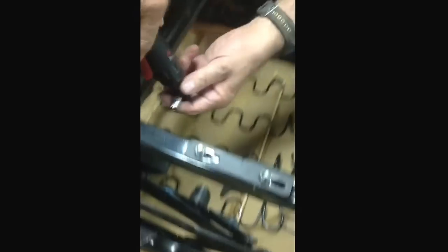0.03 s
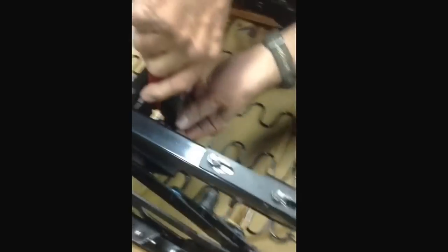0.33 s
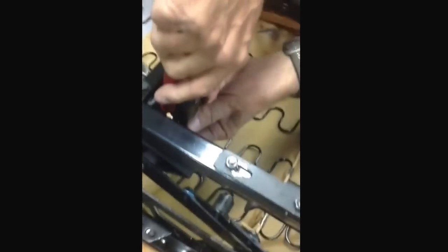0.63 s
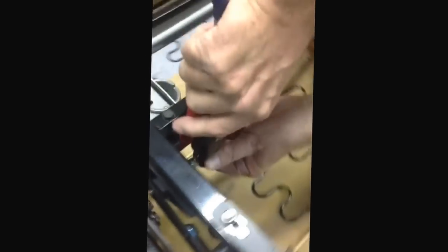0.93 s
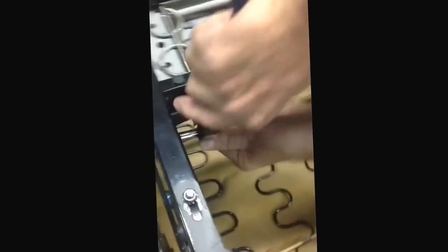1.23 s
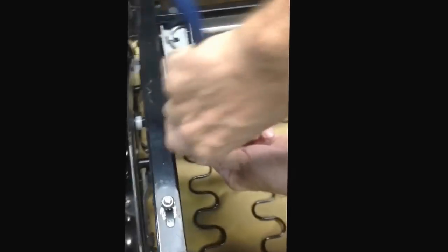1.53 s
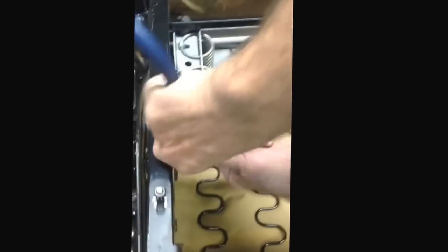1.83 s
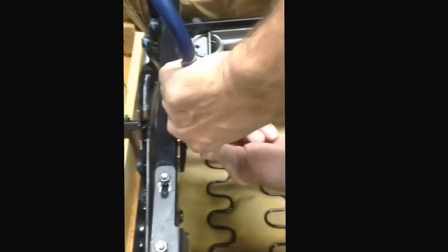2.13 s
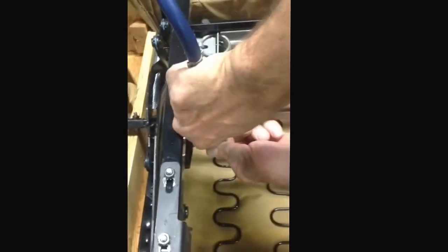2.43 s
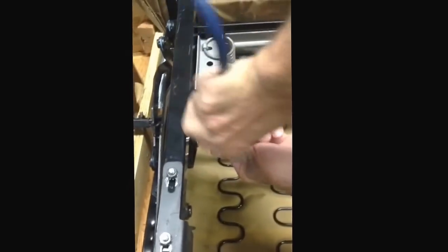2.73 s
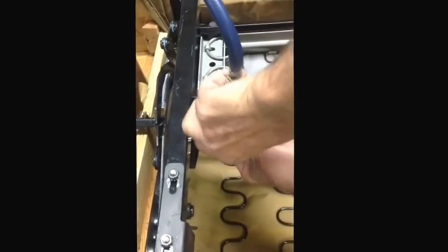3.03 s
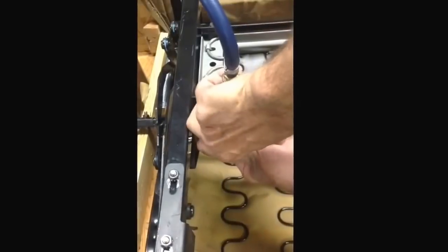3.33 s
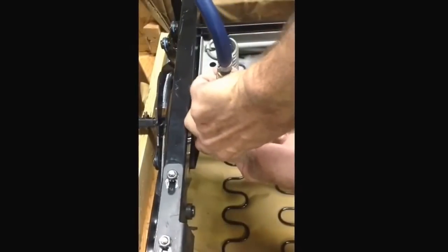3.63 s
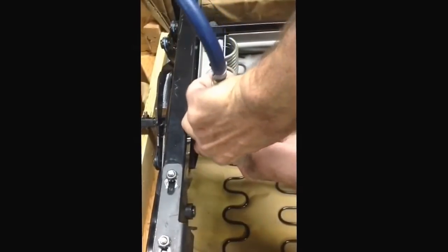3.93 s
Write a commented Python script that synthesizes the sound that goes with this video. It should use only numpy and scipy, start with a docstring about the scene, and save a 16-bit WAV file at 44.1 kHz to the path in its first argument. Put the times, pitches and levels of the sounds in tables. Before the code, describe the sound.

An air ratchet whines and rushes loudly after hose hiss and light metal ticks.

```python
"""An air ratchet drives a bolt on a steel seat frame, close by. As its valve opens, turbulent exhaust
rushes out and the vane motor whines up in pitch; as the bolt takes load, the motor slows and the pawl
rattles the steel head. Before this the tool is fitted to the bolt: the socket ticks against the frame,
and the hose coupling, which leaks all the time, spurts as it is flexed.
A low, steady workshop drone lies underneath."""
import sys
import numpy as np
from scipy import signal
from scipy.fft import rfft, irfft
from scipy.io import wavfile

SR = 44100
rng = np.random.default_rng(int(sys.argv[2]) if len(sys.argv) > 2 else 0)


def waveform_to_disk(signal):
    """Save audio, clipped to [-1, 1], as 16-bit WAV at the path in sys.argv[1]."""
    frames = np.transpose(np.atleast_2d(signal))
    scaled = np.clip(frames, -1, 1) * 32767
    samples = np.round(scaled).astype(np.int16)
    wavfile.write(sys.argv[1], SR, samples)


N = 176400
TIME = np.arange(N) / SR
TRIGGER_S = 3.269
PULSES_PER_STROKE = 17.25   # gearing: vane pulses in one cycle of the head

# motor speed as the rate at which vanes pass: (time [s], frequency [Hz])
VANE_RATE = [(3.275, 250), (3.287, 950), (3.3, 1480), (3.315, 1720), (3.33, 1820), (3.355, 1848),
             (3.39, 1825), (3.44, 1752), (3.52, 1802), (3.57, 1765), (3.65, 1660), (3.75, 1760),
             (3.79, 1700), (3.83, 1570), (3.87, 1480), (3.92, 1370), (3.96, 1320), (4.0, 1270)]


def from_db(db):
    """Amplitude ratio for a level in decibels."""
    return 10 ** (np.asarray(db) / 20)


def unit_rms(x):
    """Normalisation to unit power."""
    return x / np.sqrt(np.mean(x ** 2) + 1e-20)


def in_time(rows, column=1):
    """Linear interpolation of one column at every sample."""
    rows = np.array(rows)
    return np.interp(TIME, rows[:, 0], rows[:, column])


def butterworth(x, order, hz, kind):
    """Maximally flat low-pass or high-pass filtering."""
    return signal.sosfilt(signal.butter(order, hz, kind, fs=SR, output="sos"), x)


def drift(corner_hz):
    """Random fluctuation: low-passed noise of unit rms, computed at every 40th sample."""
    pole = np.exp(-2 * np.pi * corner_hz * 40 / SR)
    slow = signal.lfilter([1], [1, -2 * pole, pole * pole], rng.standard_normal(N // 40 + 2002))[2000:]
    return np.interp(np.arange(N) / 40, np.arange(len(slow)), unit_rms(slow))


def noise(spectrum):
    """Spectral shaping of white noise, at unit rms."""
    hz, db = np.transpose(spectrum)
    bin_hz = np.maximum(np.arange(N // 2 + 1) * SR / N, 1)
    gain = from_db(np.interp(np.log(bin_hz), np.log(hz), db))
    return unit_rms(irfft(rfft(rng.standard_normal(N)) * gain, N))


def resonate(x, hz, width_hz):
    """Forced response of a two-pole resonator, at unit rms."""
    r = np.exp(-np.pi * width_hz / SR)
    return unit_rms(signal.lfilter([1, 0, -1], [1, -2 * r * np.cos(2 * np.pi * hz / SR), r * r], x))


def noise_bands(modes, envelope=1):
    """Random excitation: each resonance selects a narrow band from its own noise."""
    return sum(from_db(db) * resonate(rng.standard_normal(N) * envelope, hz, width)
               for hz, width, db in modes)


def workshop():
    """Broadband noise makes a fan-like drone; narrowband noise is heard as a wavering hum."""
    # spectral density of the drone: (frequency [Hz], relative level [dB])
    drone_spectrum = [(25, -48), (55, -35), (75, -21), (100, -15), (160, -5), (240, 1), (330, -2.5),
                      (420, -4.5), (600, -4.5), (900, -10.5), (1500, -17), (4000, -23.5)]
    # bands of the hum: (frequency [Hz], bandwidth [Hz], level before the high-pass [dB])
    hum_bands = [(166.2, 5.6, -45), (223.4, 7.8, -43), (282, 21, -43.5), (434, 28, -45), (610, 45, -46.5)]
    hum = butterworth(noise_bands(hum_bands), 4, 130, "high")
    return from_db(-30.5) * noise(drone_spectrum) + hum


def coupling_leak():
    """Jet noise: escaping air hisses, with brighter, faintly whistling spurts as the coupling flexes."""
    # hiss as the hands turn the coupling: (time [s], body level [dB], treble level [dB])
    hiss_levels = [(0, -32, -34.5), (.12, -31.5, -38), (.25, -29.5, -33), (.5, -31.5, -37),
                   (.66, -29.5, -34), (.8, -31.5, -37), (.91, -35, -43), (.96, -27.5, -37),
                   (1.14, -32, -35), (1.29, -27.5, -27), (1.55, -30, -28), (1.8, -28.5, -25.5),
                   (1.9, -31, -27.5), (1.99, -31, -36), (2.17, -29.5, -36), (2.27, -28, -30.5),
                   (2.43, -30, -35.5), (2.74, -32.5, -39.5), (2.86, -30, -34.5), (3.05, -30.5, -36),
                   (3.25, -31.5, -33)]
    # spectral density of the hiss's body: (frequency [Hz], relative level [dB])
    body_spectrum = [(300, -23), (1000, 0), (2300, 2), (4800, -1), (6500, -4), (9000, -9), (16000, -20)]
    # spectral density of its treble: (frequency [Hz], relative level [dB])
    treble_spectrum = [(2000, -16), (5000, -1), (8000, -1), (11000, -1.5), (15000, -4.5)]
    # spurts of air: (time [s], duration [s], level [dB])
    spurts = [(0.152, 0.045, -26), (0.33, .05, -24.5), (0.531, 0.043, -25.5), (.725, .025, -35),
              (2.21, 0.057, -32), (2.467, 0.052, -32)]
    # spectral density of a spurt: (frequency [Hz], relative level [dB])
    spurt_spectrum = [(500, -14), (2000, 2), (6000, 0), (8000, -5.5), (12000, 0), (15000, 1)]
    # whistles in a spurt: (frequency [Hz], bandwidth [Hz], relative level [dB])
    whistle_modes = [(4580, 100, -15), (6220, 130, -17.5), (15000, 200, -13)]
    attack_s, release_s = .0015, .012
    flutter_db = .57 * drift(25)
    body = from_db(in_time(hiss_levels) + flutter_db) * noise(body_spectrum)
    treble = from_db(in_time(hiss_levels, column=2) + flutter_db) * noise(treble_spectrum)
    spurting = np.zeros(N)
    for start, duration, db in spurts:
        attack = np.clip((TIME - start) / attack_s, 0, 1)
        release = np.exp(-np.maximum(TIME - start - duration, 0) / release_s)
        spurting += from_db(db) * attack * release
    return body + treble + spurting * (noise_bands(whistle_modes) + noise(spurt_spectrum))


def socket_knocks():
    """Damped free vibration: each impact of the socket rings the modes of the frame."""
    # impacts: (time [s], level [dB])
    impacts = [(.534, -15), (.965, -22), (1.305, -18), (1.9195, -11.5), (2.8428, -17)]
    # modes of the frame: (frequency [Hz], relative level [dB], 60 dB decay time [s])
    frame_modes = [(894, -15, 0.048), (1360, -16, 0.032), (1620, -10, .03), (1900, -10.5, .025),
                   (2150, -11, .025), (2820, -12, .03), (5200, -14, .01)]
    ring = np.zeros(N)
    for start, impact_db in impacts:
        age = np.maximum(TIME - start, 0)
        for hz, mode_db, t60 in frame_modes:
            decay_db = np.minimum(60 * age / t60, 200)
            ring += from_db(impact_db + mode_db - decay_db) * np.sin(2 * np.pi * hz * age)
    return ring


def flow_swing(strokes, load):
    """Amplitude modulation: under load the air flow swings about its mean, highest on the drive stroke."""
    return .25 * load * np.cos(2 * np.pi * strokes)


def vane_phase(strokes, load):
    """Frequency modulation: the motor's speed jitters and, under load, ripples once per stroke."""
    ripple_share, jitter_share = .05, .002
    ripple = ripple_share * load * PULSES_PER_STROKE * np.sin(2 * np.pi * strokes)
    jitter = np.cumsum(jitter_share * in_time(VANE_RATE) * drift(122)) / SR
    return 2 * np.pi * (strokes * PULSES_PER_STROKE + jitter) + ripple


def motor_whine(phase, strokes, load):
    """Siren principle: periodic vane pulses make a tone, rougher under load, with passing harmonics."""
    # fundamental of the whine: (time [s], level [dB])
    whine_levels = [(3.277, -14), (3.281, -19), (3.287, -8.5), (3.3, -18), (3.31, -24), (3.33, -16.5),
                    (3.38, -15), (3.434, -26), (3.53, -18.5), (3.6, -24.5), (3.66, -24), (3.71, -21),
                    (3.785, -23), (3.803, -33), (3.825, -27), (3.85, -27), (3.88, -20), (3.916, -20),
                    (4.0, -20)]
    # brief overtones: (harmonic number, level [dB], centre time [s], half duration [s], roughness [0-1])
    overtones = [(4, -29, 3.35, .05, .6), (4, -26, 3.51, .06, .2), (5, -22.5, 3.66, .07, .25),
                 (4, -29, 3.65, .05, .4), (2, -31, 3.65, .04, .6), (2, -25, 3.825, .033, .9),
                 (4, -23, 3.84, .045, .7), (5, -26, 3.84, .04, .7), (2, -27, 3.93, .04, .9),
                 (4, -24, 3.96, .05, .7)]
    tone = from_db(in_time(whine_levels)) * np.sin(phase) * (1 + .35 * load * drift(130))
    flow = 1 + flow_swing(strokes, load)
    for harmonic, db, centre_s, half_s, roughness in overtones:
        scatter = (drift(120) + 1j * drift(120)) / np.sqrt(2)   # random in amplitude and phase
        flutter = np.sqrt(1 - roughness ** 2) + roughness * scatter
        swell = np.exp(-.5 * ((TIME - centre_s) / half_s) ** 4)
        tone += from_db(db) * swell * flow * np.real(flutter * np.exp(1j * harmonic * phase))
    return np.sqrt(2) * tone


def exhaust(phase, strokes, load):
    """Turbulent air, one puff per vane, excites the housing; it roars on strokes and spits in between."""
    # spectral density of the exhaust: (frequency [Hz], relative level [dB])
    jet_spectrum = [(60, -34), (130, -30), (220, -11), (400, -36), (900, -12.5), (1900, -7.5), (3000, -7.5),
                    (4000, -5), (5700, -4.5), (7600, -3), (9800, -4), (12000, -1.5), (13800, 2),
                    (15200, -2)]
    # resonances of the housing: (frequency [Hz], bandwidth [Hz], level [dB])
    housing_modes = [(1497, 120, -30.5), (2335, 180, -28), (7650, 1100, -26.5), (14900, 700, -23)]
    crossover_hz, surge_s = 11000, .075
    puffs = 1 + .17 * np.cos(phase)
    swing = flow_swing(strokes, load)
    roar = butterworth(noise(jet_spectrum), 6, crossover_hz, "low") * (1 + swing)
    spit = butterworth(noise(jet_spectrum), 6, crossover_hz, "high") * (1 - swing)
    surge_db = np.exp(-np.maximum(TIME - TRIGGER_S, 0) / surge_s)   # 1 dB louder at first
    rush_gain = from_db(-12 + surge_db + .6 * drift(120))
    spit_gain = from_db(.7 + 1.3 * drift(100))
    return rush_gain * puffs * (roar + spit_gain * spit) + noise_bands(housing_modes, puffs)


def ratchet_head(strokes, load):
    """Impulse excitation: the pawl grinds over the teeth and rings the head, faintly on the return."""
    # resonances of the steel head: (frequency [Hz], bandwidth [Hz], relative level [dB])
    head_modes = [(2400, 300, -9), (3900, 250, -6.5), (6030, 500, -1), (7750, 500, -3), (9600, 900, -4),
                  (12700, 1500, -8)]
    slips_per_s, width_strokes, return_share = 6000, .13, .2
    drive = np.exp(-.5 * (((strokes + .5) % 1 - .5) / width_strokes) ** 2)
    back = np.exp(-.5 * ((strokes % 1 - .5) / width_strokes) ** 2)
    contact = load * np.maximum(drive, return_share * back)
    slips = (rng.random(N) < slips_per_s / SR) * rng.standard_normal(N)
    ring = sum((-1) ** k * from_db(db) * resonate(slips, hz, width)
               for k, (hz, width, db) in enumerate(head_modes))
    return from_db(-13.3 + drift(50)) * contact * unit_rms(ring)


def air_ratchet():
    """Mechanical coupling: once the valve opens, one motor speed times the whine, exhaust and head."""
    # resistance of the bolt: (time [s], load [0-1])
    bolt_load = [(3.3, .15), (3.55, .15), (3.64, .35), (3.76, .15), (3.81, .7), (3.92, 1), (4.0, 1)]
    valve_opening_s, whine_attack_s, drive_stroke_at_s = .0095, .004, 3.9365
    load = in_time(bolt_load)
    pulses = np.cumsum(in_time(VANE_RATE)) / SR
    strokes = (pulses - np.interp(drive_stroke_at_s, TIME, pulses)) / PULSES_PER_STROKE
    phase = vane_phase(strokes, load)
    valve = np.clip((TIME - TRIGGER_S) / valve_opening_s, 0, 1)
    spinning = np.clip((TIME - VANE_RATE[0][0]) / whine_attack_s + 1, 0, 1)
    whine = spinning * motor_whine(phase, strokes, load)
    return whine + valve * (exhaust(phase, strokes, load) + ratchet_head(strokes, load))


def scene():
    """Superposition of direct sound, early reflections and the drone, the same in both channels."""
    # reflections from the frame, bench and walls: (delay [s], relative level [dB])
    reflections = [(.0031, -19), (0.0128, -17), (.025, -22)]
    direct = air_ratchet() + coupling_leak() + socket_knocks()
    echoes = sum(from_db(db) * np.pad(direct, (int(delay * SR), 0))[:N] for delay, db in reflections)
    return np.tile(direct + echoes + workshop(), (2, 1))


def record(dry):
    """Band limiting and soft saturation: a small microphone loses bass and top and rounds the peaks."""
    low_hz, high_hz = 95, 15250
    thin = butterworth(dry, 2, low_hz, "high")
    rounded = 2 * np.tanh(thin / 2)
    return signal.sosfilt(signal.ellip(12, .1, 80, high_hz, fs=SR, output="sos"), rounded)


dry = scene()
out = record(dry)
waveform_to_disk(out)
```